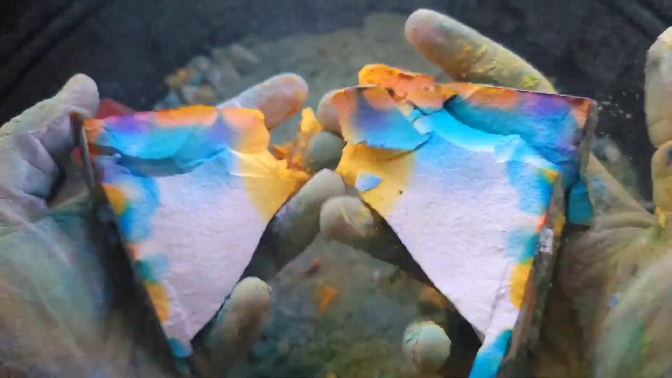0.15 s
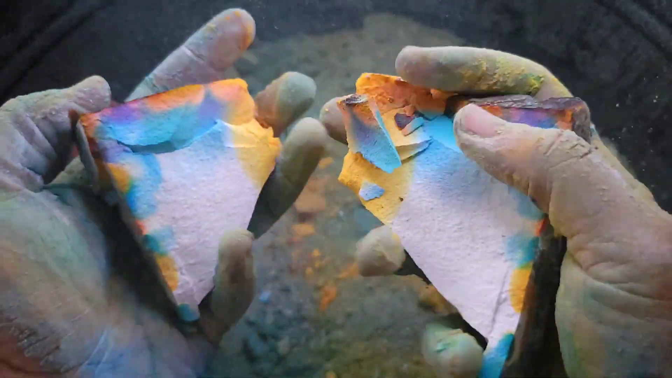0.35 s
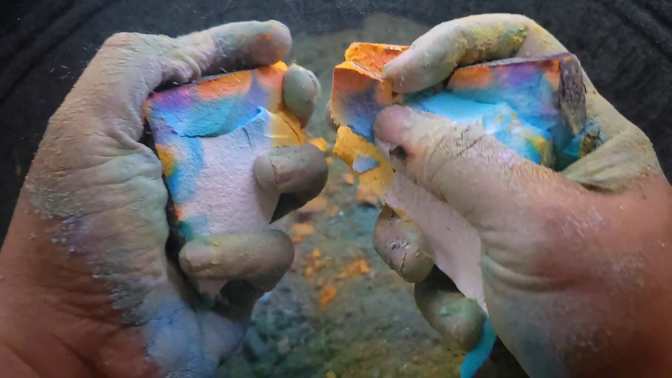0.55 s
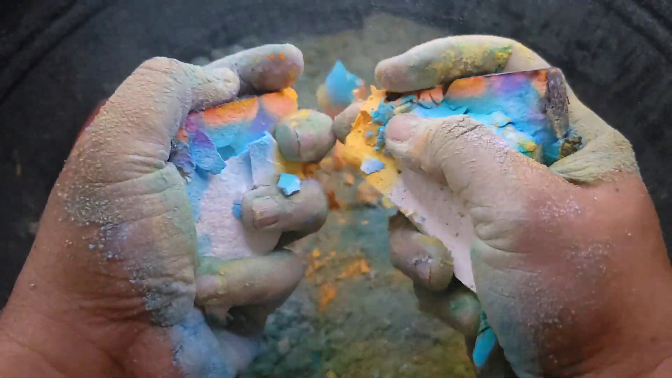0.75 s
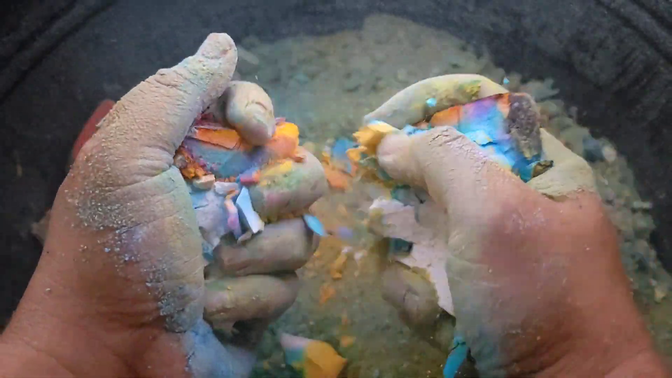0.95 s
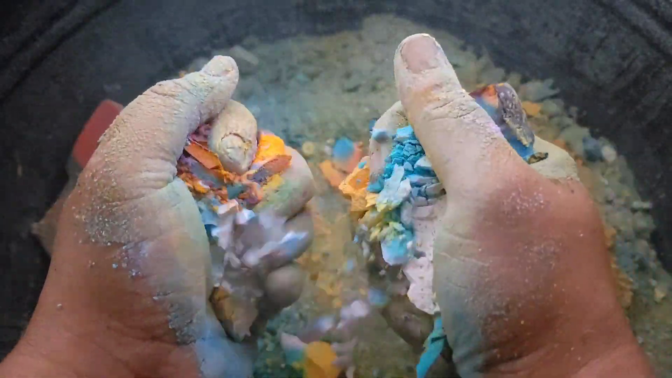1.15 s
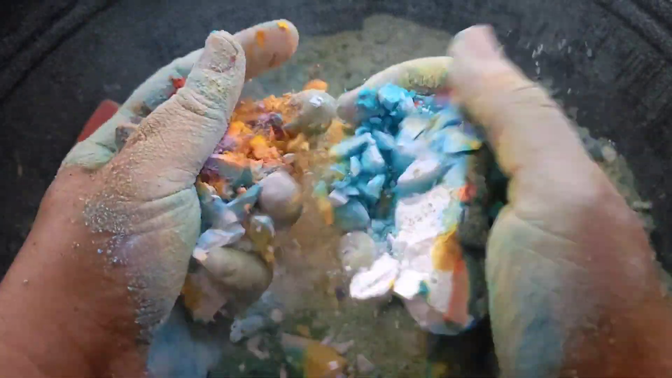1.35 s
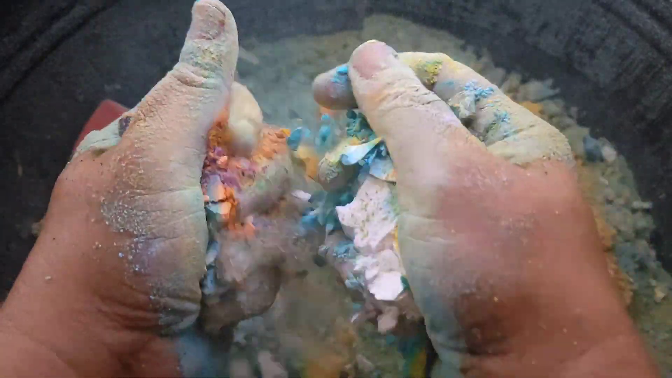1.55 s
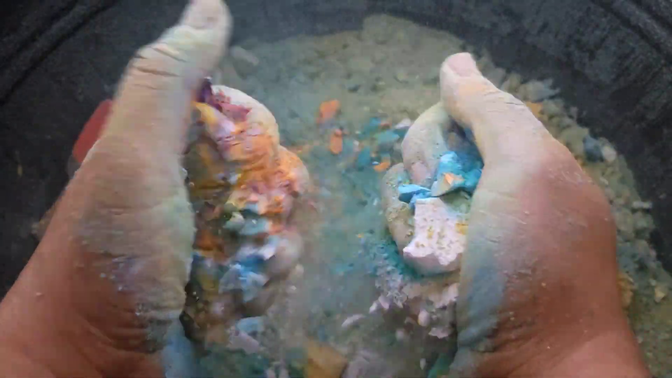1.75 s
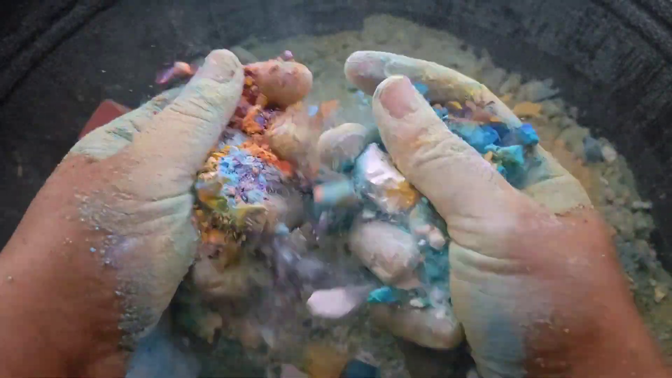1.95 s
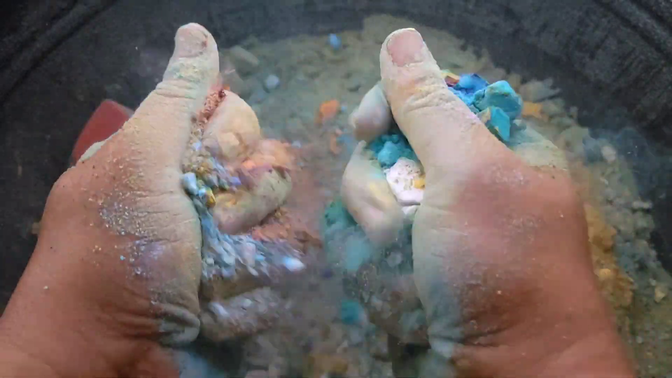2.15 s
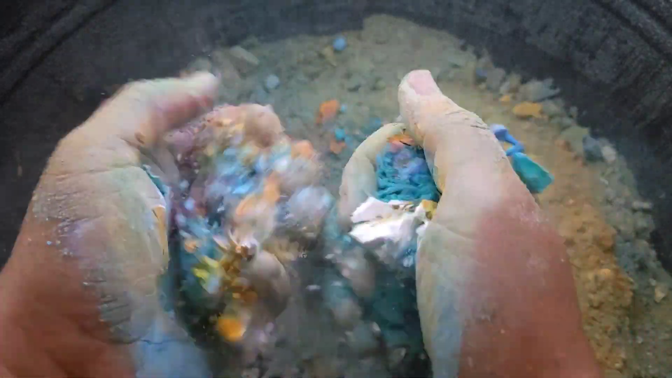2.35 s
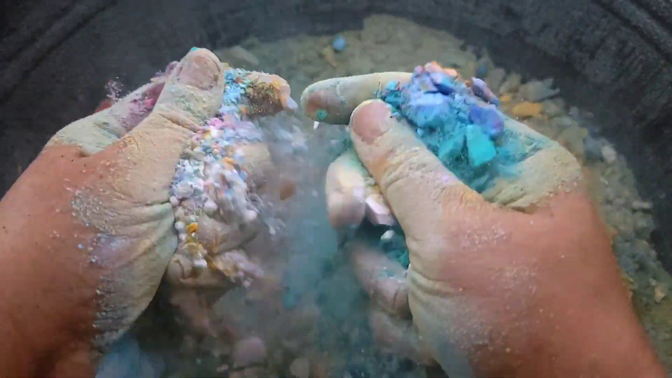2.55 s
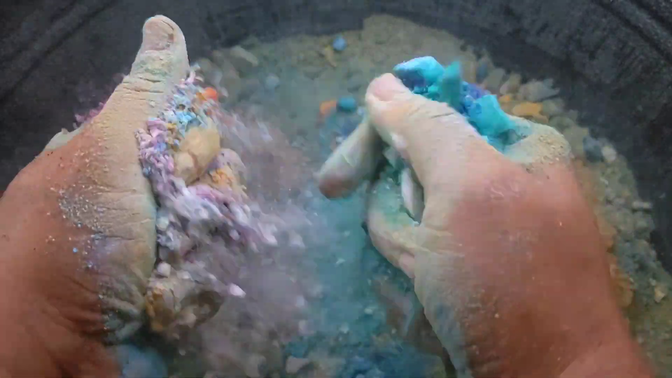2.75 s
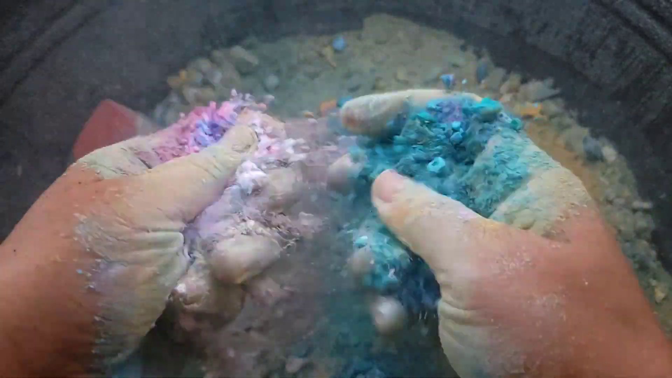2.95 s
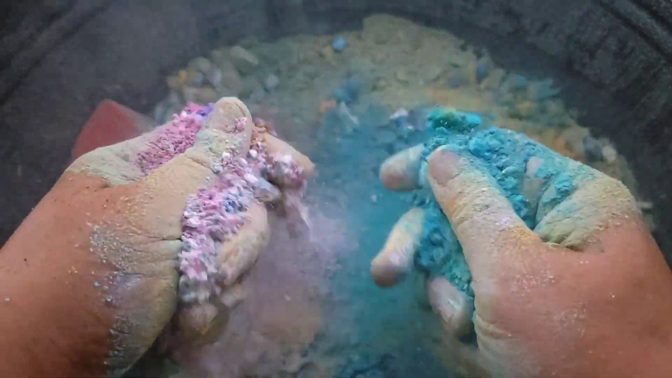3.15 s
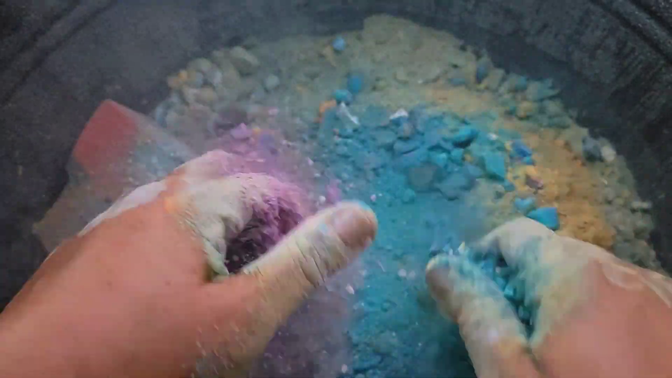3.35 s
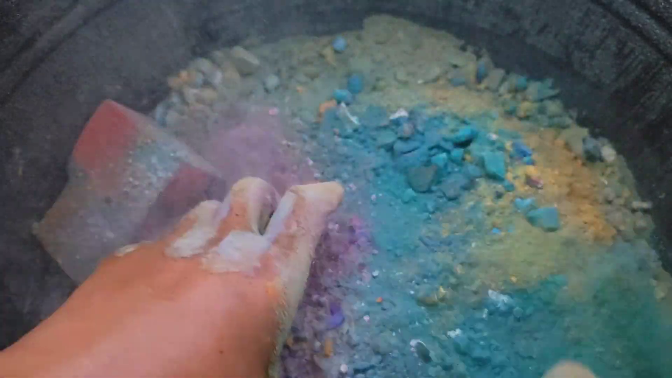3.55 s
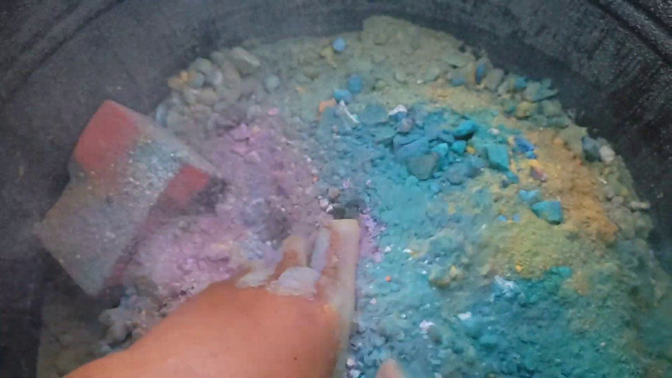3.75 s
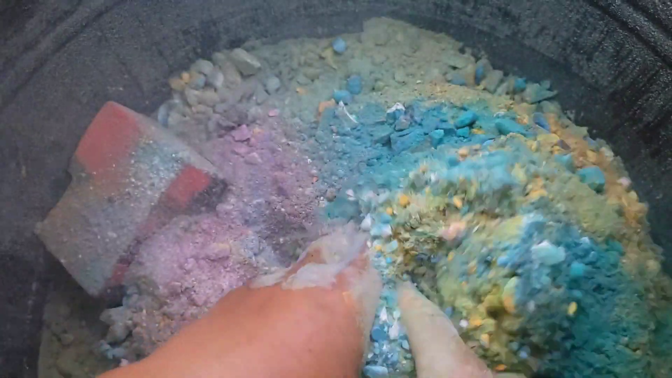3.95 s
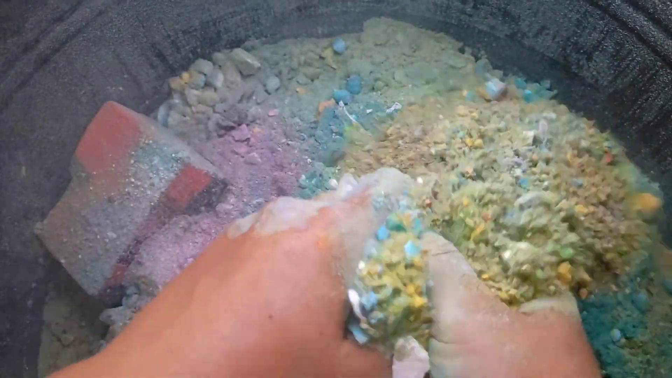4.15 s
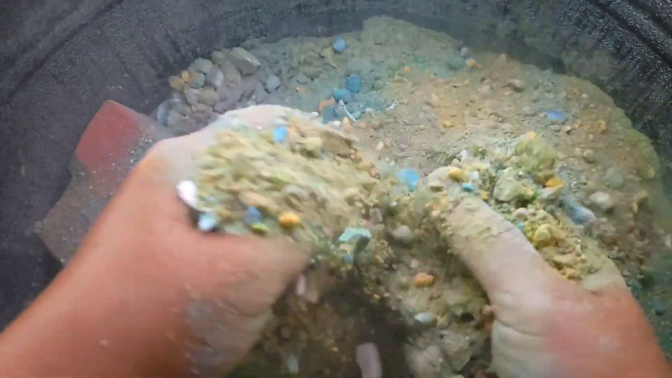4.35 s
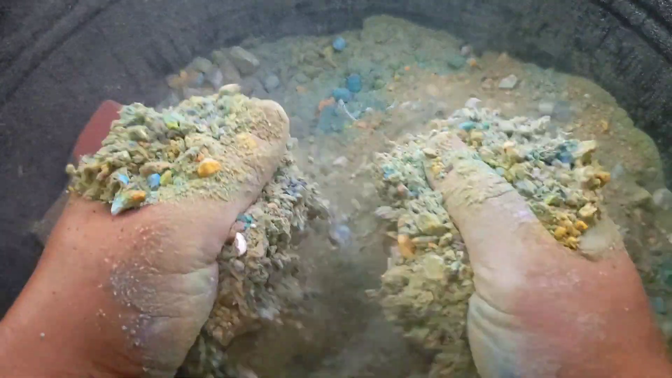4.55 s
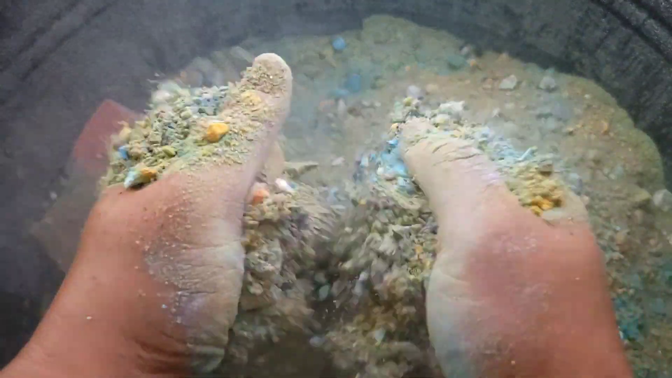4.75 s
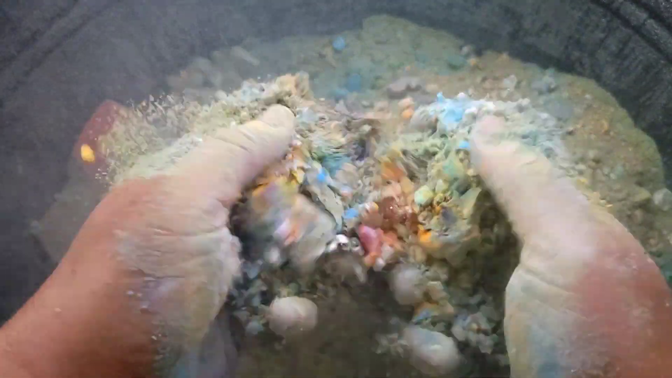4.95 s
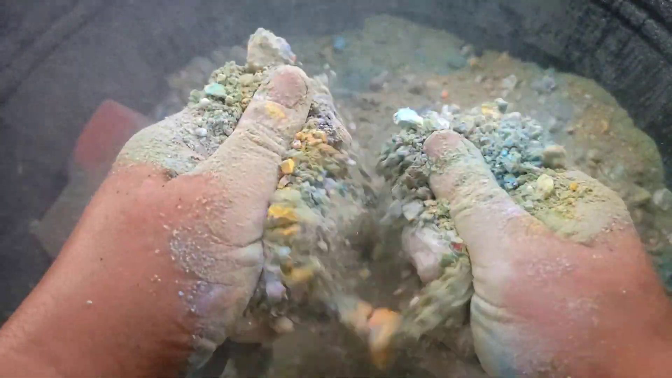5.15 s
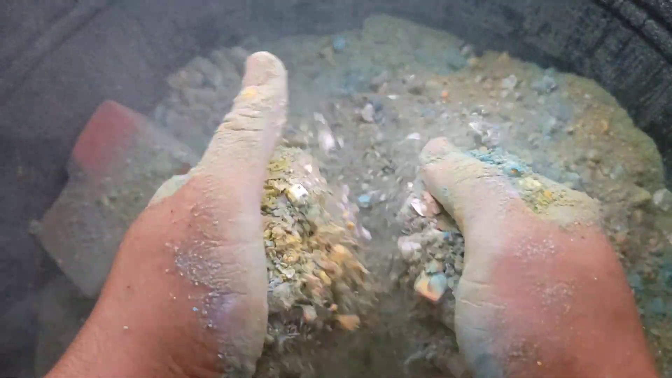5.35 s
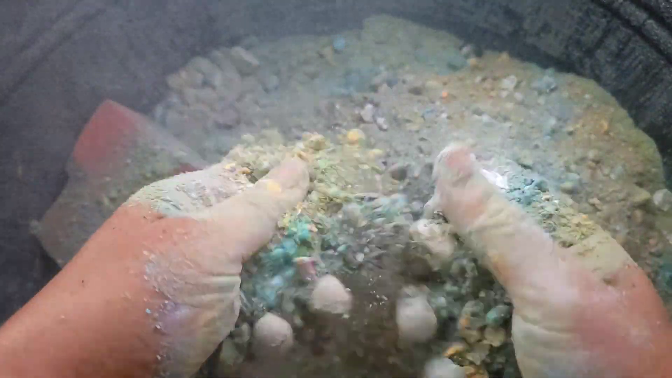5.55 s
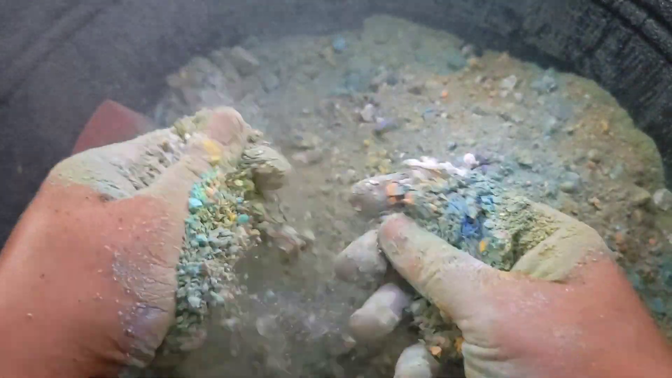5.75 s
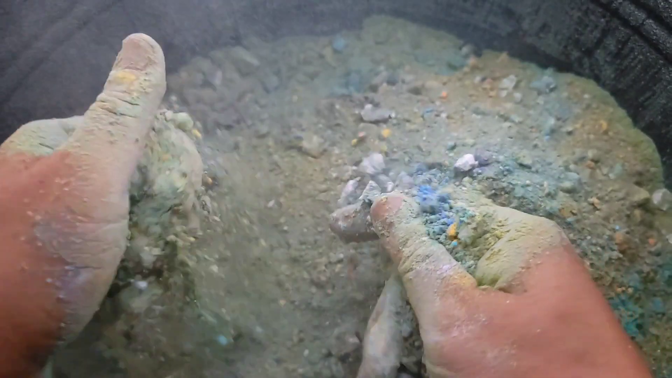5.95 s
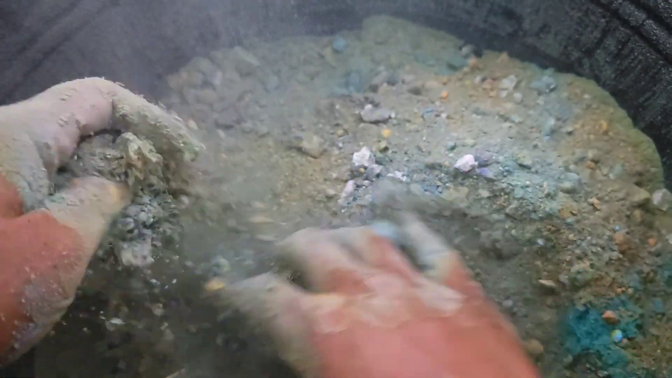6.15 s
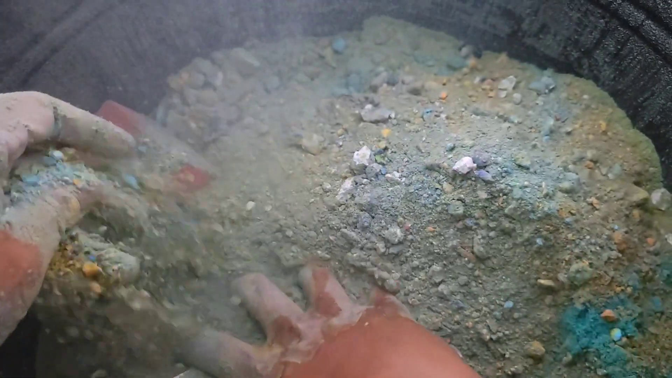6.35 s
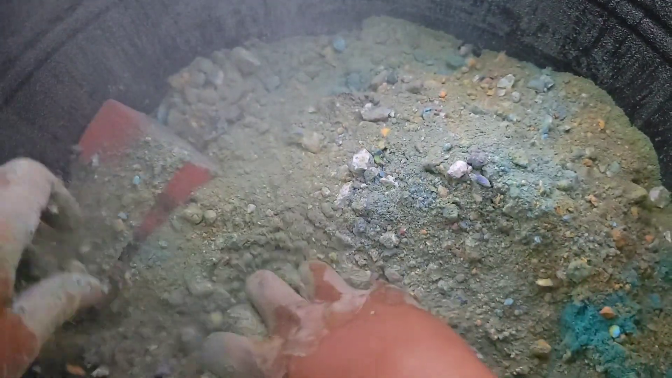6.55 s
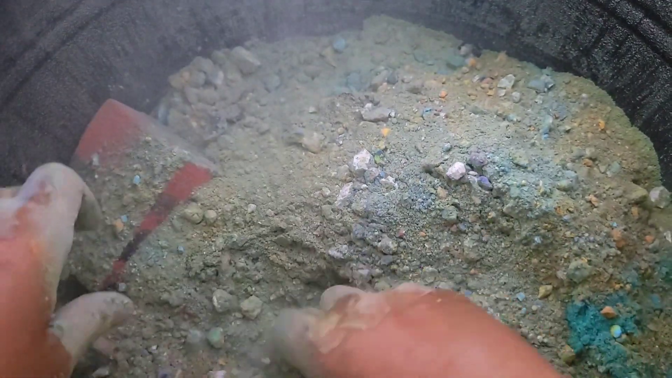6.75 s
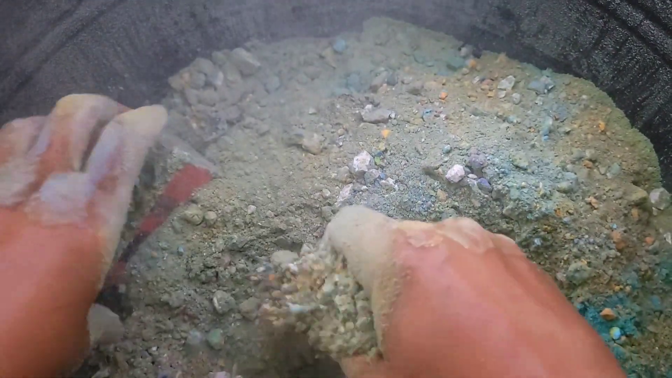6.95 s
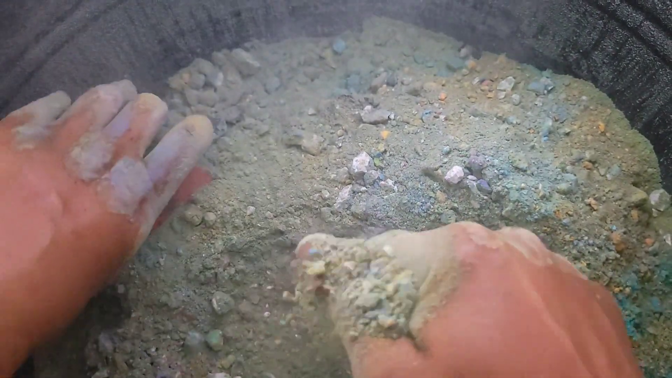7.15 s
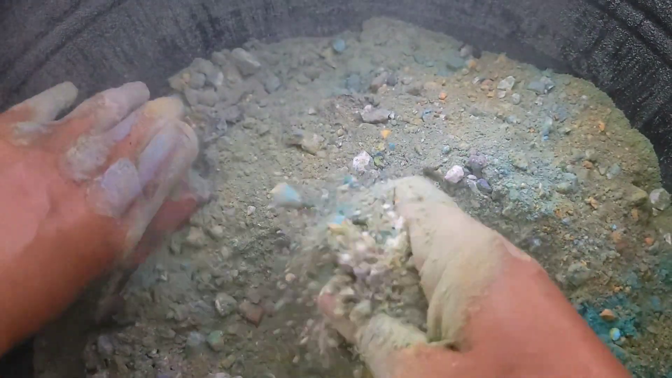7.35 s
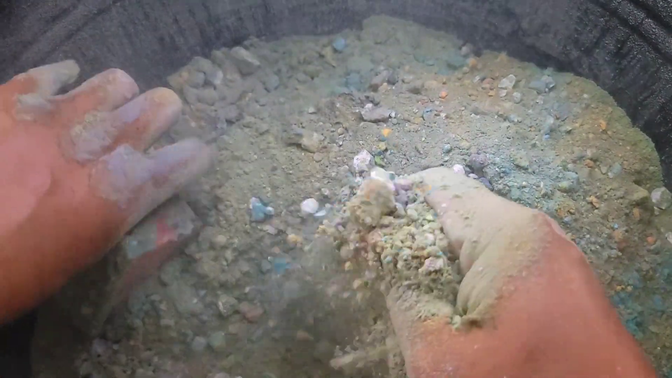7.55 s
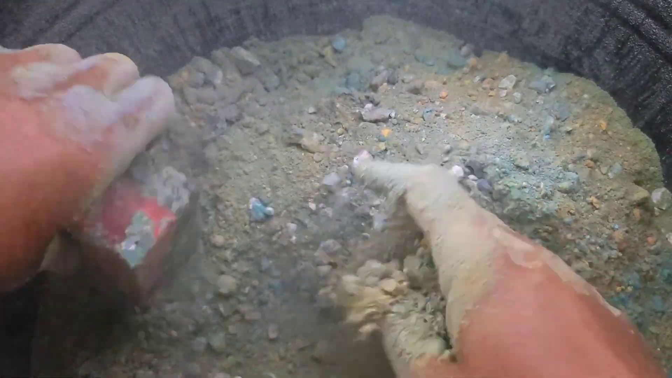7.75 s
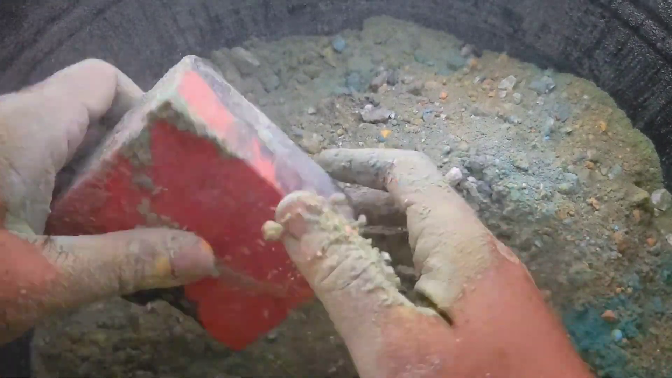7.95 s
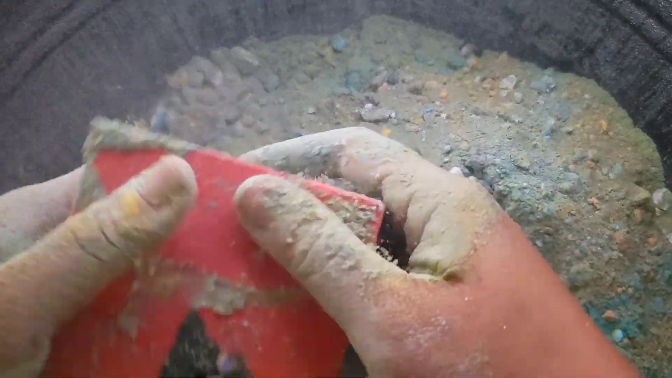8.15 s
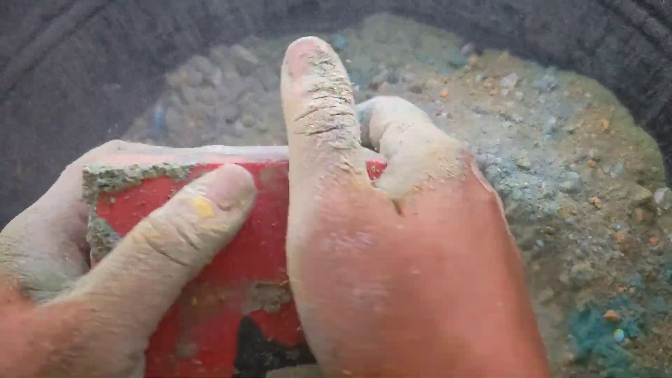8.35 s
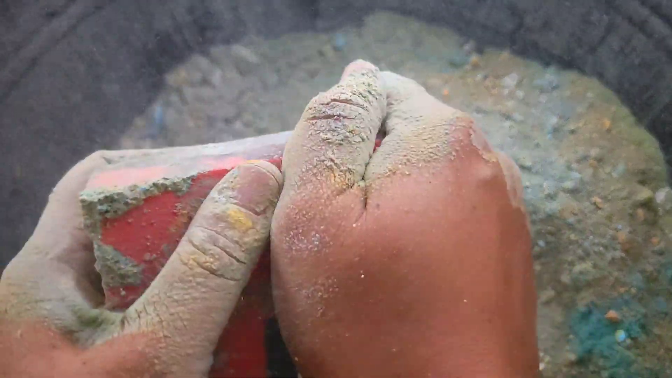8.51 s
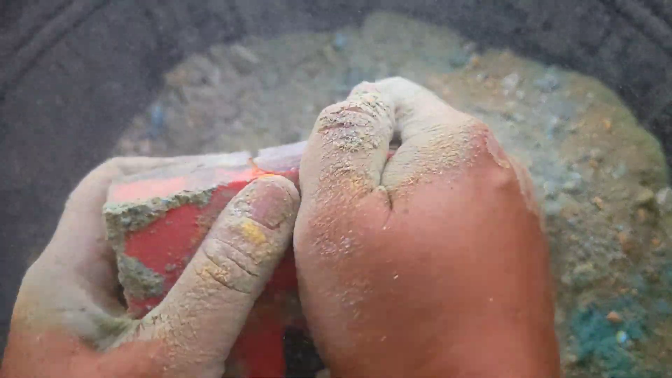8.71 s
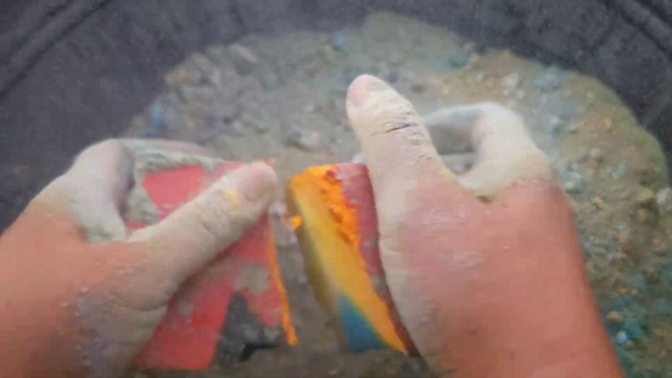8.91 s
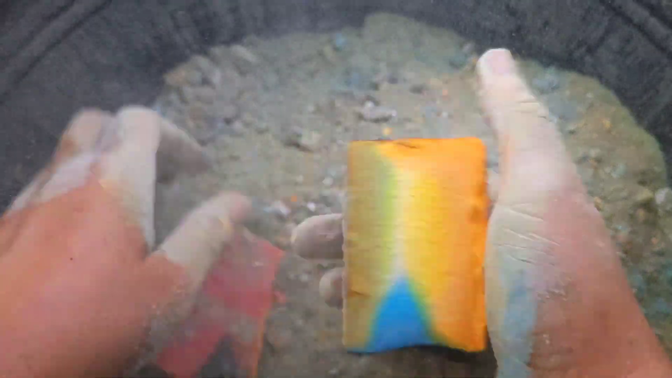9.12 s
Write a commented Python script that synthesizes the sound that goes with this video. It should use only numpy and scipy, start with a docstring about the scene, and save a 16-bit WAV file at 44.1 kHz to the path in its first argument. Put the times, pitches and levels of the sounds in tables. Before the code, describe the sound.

Close to the microphone, two hands crush chalk over a plastic tub, with irregular gritty crunches, sharp snaps and trickling crumbs. Fingers dig into the powder with a muffled crunch, crumble more lumps and dig again. Then a fresh block is picked up with a few dull bumps, rubbed between dry palms and snapped in two. The tub resonates slightly and the small room hums faintly.

```python
"""Crumbling grit and sharp snaps: two hands crush gym chalk over a plastic tub, close to the microphone.
Squeezed chalk breaks grain by grain, larger fractures ring their fragments, and fingers dig in the
powder with a muffled crunch. Then a fresh block is picked up with a few bumps, rubbed between dry
palms that catch and slip, and broken in two. The tub resonates; the small room hums faintly."""
import sys
import numpy as np
from scipy import signal
from scipy.fft import rfft, irfft, next_fast_len
from scipy.io import wavfile
from scipy.ndimage import uniform_filter1d, map_coordinates

SR = 44100
rng = np.random.default_rng(int(sys.argv[2]) if len(sys.argv) > 2 else 0)


def materialize(psi):
    """Save the field psi as 16-bit PCM at rate SR to the path in sys.argv[1].

    A 1-D psi becomes a single channel; in a 2-D psi each row is a channel.
    """
    bounded = np.clip(np.atleast_2d(psi).T, -1, 1)
    quanta = np.round(bounded * 32767).astype(np.int16)
    wavfile.write(sys.argv[1], SR, quanta)


N = 409248

# fist closing on chalk; crumbs trickling from the hands:
# (start [s], length [s], grit [dB], crumbs [dB], powder [dB])
SQUEEZES = [(0, 0.0071, -38, -71, -53), (0.112, 0.17, -42, -54, -45.5), (0.49, 0.029, -49, -62, -58),
            (0.62, 0.23, -45, -55, -49), (0.781, 0.048, -26, -27, -29.5), (0.836, 0.084, -34.5, -54, -41),
            (0.957, 0.11, -35, -33.5, -36.5), (1.084, 0.054, -35, -38, -42), (1.208, 0.13, -41, -43, -44),
            (1.34, 0.12, -35, -37, -48), (1.464, 0.13, -38, -41, -50), (1.553, 0.15, -36, -38, -41),
            (1.685, 0.047, -45, -60, -52), (1.901, 0.12, -42, -47, -42), (2.032, 0.097, -35.5, -42, -36),
            (2.145, 0.079, -37, -42, -42), (2.308, 0.14, -47.5, -44.5, -52),
            (2.478, 0.086, -39.5, -39.5, -41.5), (2.584, 0.091, -41, -46, -42.5),
            (2.692, 0.31, -43.5, -41, -48), (3.012, 0.28, -45, -44.5, -48.5),
            (3.369, 0.096, -48.5, -42, -44.5), (4.396, 0.22, -43.5, -42, -50), (4.544, 0.15, -44, -43, -44),
            (4.692, 0.1, -36, -39, -41.5), (4.82, 0.064, -35.5, -44, -37.5), (4.899, 0.042, -38, -42, -42),
            (4.984, .145, -40.5, -38.5, -45), (5.149, 0.097, -39.5, -40, -41.5),
            (5.235, 0.13, -40.5, -54, -38.5), (5.49, 0.18, -47.5, -48, -52), (5.719, 0.22, -44.5, -44, -45),
            (6.11, 0.088, -40, -47, -43), (6.239, 0.053, -37, -36, -31.5), (6.315, 0.049, -40, -47, -36),
            (6.869, 0.25, -45, -45, -49.5), (7.176, 0.025, -42, -37, -37.5), (7.24, 0.098, -43, -40, -41),
            (7.408, 0.11, -40, -35.5, -41), (7.702, 0.12, -49, -41, -47), (8.567, 0.059, -39.5, -54, -35)]
TRICKLES = [(0.398, 3.15, -50, -56, -56), (3.81, 2.85, -50, -49, -60), (7.302, 0.68, -47.5, -47.5, -56)]
# pushes into powder: (deepest [s], 60 dB rise [s], 60 dB fall [s], powder [dB], crumbs [dB], grit [dB])
DIGS = [(3.54, 0.032, 0.26, -34, -29, -53), (3.668, 0.23, 0.11, -29.5, -31, -43.5),
        (3.768, 0.57, 0.54, -21, -26.5, -48.5), (3.92, 0.85, 1, -32, -53, -67),
        (4.19, 1.5, 0.77, -49, -36.5, -64), (4.27, 0.55, 0.11, -41, -27, -43.5),
        (6.35, 0.26, 0.38, -25.5, -42, -40), (6.44, 0.21, 0.11, -28, -32, -38.5),
        (6.494, 0.39, 0.32, -23.5, -53, -42), (6.608, 0.15, 0.51, -28, -27, -39),
        (6.729, 0.17, 1, -40, -33.5, -50), (7.405, 0.19, 0.11, -44, -35, -47),
        (7.605, 0.03, 0.12, -21.5, -59, -33.5), (9.123, 0.056, 0.16, -29.5, -35, -44)]
# spectral shapes: (frequency [Hz], relative level [dB])
CRUMB_SPECTRUM = [(150, -58), (400, 20.5), (700, 3.5), (1100, 8), (1800, 0), (2700, -3), (4500, -19),
                  (12000, -104)]
GRIT_SPECTRUM = [(700, -58), (1700, -3.5), (2700, -0.5), (4200, 0.5), (6500, -2), (9000, -6.5),
                 (12500, -23), (16000, -48)]
POWDER_SPECTRUM = [(20, -26), (50, 4), (120, 1), (300, 0), (500, 1), (750, -8), (1300, -12), (2200, -25.5),
                   (6000, -43), (15000, -47)]
SIZZLE_SPECTRUM = [(4000, -63), (7000, -10), (9000, 9), (11000, 5), (13000, 1), (16000, -6)]
AIR_SPECTRUM = [(20, -23), (50, 2), (110, 4), (160, 1), (250, 0.5), (380, 1.5), (600, -12.5), (1000, -12),
                (2000, -21), (5000, -20.5), (9000, -26.5), (12000, -33.5), (16000, -35)]
CRACK_SPECTRUM = [(500, -34), (1500, -6), (3500, 4), (6000, 5.5), (9000, -3.5), (12500, -24.5),
                  (16000, -13.5)]
RASP_SPECTRUM = [(400, -24), (1200, -30), (2200, 2), (3600, 5), (6800, 10.5), (9000, 0.5), (13000, -38)]
# room hum: (frequency [Hz], level [dB], waver [dB])
HUM_TONES = [(233.8, -48, 3.5), (1500, -65, 8)]
# hum contour: (time [s], gain [dB])
HUM_GAIN = [(0, 3), (.25, -9), (1.3, -1), (8.2, 1.5), (8.75, 0), (9.0, 1)]
# loudest fractures: (time [s], ring [dB], ring pitch [Hz], crack [dB], knock [dB])
SNAPS = [(.0778, -43, 2190, -43.5, -48), (.1317, -17.5, 1600, -27, -21.5), (.209, -38, 2300, -48, -47),
         (.222, -34, 1440, -55, -37), (.256, -29, 1650, -40, -30), (.4217, -31.5, 3020, -42, -42.5),
         (.5055, -46, 4450, -34, -65), (.5129, -30, 5930, -40, -53), (.5234, -31, 1650, -18, -30),
         (.5867, -30, 2670, -29.5, -62), (.6133, -32, 2180, -28, -49), (.6237, -20.5, 2600, -28, -36),
         (.6268, -19, 3450, -18.5, -22.5), (.633, -28, 2630, -39, -39), (.6704, -41, 2510, -32.5, -37.5),
         (.7478, -35, 2000, -29.5, -39), (.7719, -34.5, 3020, -25.5, -35), (.7966, -23, 2900, -23, -22.5),
         (.8035, -14, 3200, -37, -40), (.822, -27, 4190, -16.5, -48), (.8371, -17.5, 3570, -39, -46),
         (.885, -48, 2000, -27, -48), (.8896, -20.5, 5460, -42, -54), (.9132, -20.5, 2350, -25, -55),
         (.9409, -32, 4400, -39, -49), (.9657, -7.5, 1490, -30, -17.5), (.9682, -14, 1220, -25, -40),
         (.9849, -15, 4200, -36, -22), (1.024, -18.5, 1535, -26, -17.5), (1.0286, -20, 2500, -30, -37),
         (1.0417, -14.5, 2180, -38, -32), (1.063, -25, 2760, -23.5, -32), (1.0899, -20.5, 3500, -44, -34),
         (1.1939, -31, 1930, -31.5, -40), (1.2454, -31.5, 2000, -41, -39), (1.2812, -35, 2500, -39, -39),
         (1.3339, -47, 1570, -30.5, -55), (1.352, -24.5, 2120, -29, -39), (1.3596, -27, 2540, -35, -33),
         (1.4294, -31, 1220, -47, -30), (1.4399, -29, 2050, -46, -37), (1.4438, -27.5, 1800, -42, -30),
         (1.4524, -28.5, 1900, -42, -37), (1.5054, -39, 3000, -38, -36), (1.5696, -29, 1870, -32, -35),
         (1.583, -34, 4480, -32, -39), (1.5961, -28, 2600, -42, -48), (1.6296, -37, 5600, -33, -37),
         (1.6394, -22.5, 1860, -23, -24), (1.6531, -28, 2800, -35, -44), (1.6685, -27, 2340, -21, -27),
         (1.7018, -38, 3000, -34, -52), (1.715, -34, 2800, -41, -53), (1.7987, -28.5, 1920, -44, -32.5),
         (1.9298, -33, 2980, -49, -43), (1.9605, -28.5, 2390, -36, -42), (1.9691, -24, 2000, -33, -28.5),
         (1.9992, -35, 3400, -47, -35), (2.0105, -27, 1950, -51, -31), (2.0349, -25.5, 1840, -48, -36),
         (2.0475, -32, 1920, -29.5, -46), (2.0669, -26, 2070, -48, -25.5), (2.095, -28.5, 6070, -23.5, -49),
         (2.1061, -25.5, 2140, -46, -31), (2.1605, -35.5, 1600, -45, -35), (2.1906, -36, 2100, -37, -37),
         (2.2205, -30.5, 2630, -55, -36), (2.2845, -24, 2480, -39, -32.5), (2.621, -40, 1700, -40, -31.5),
         (2.6556, -40, 3900, -31.5, -50), (2.7076, -32, 2980, -54, -53), (2.7714, -25.5, 3320, -59, -29),
         (2.8464, -31, 2040, -55, -38), (2.86, -36, 2110, -43, -42), (2.8923, -44, 1500, -47, -31.5),
         (2.9175, -39, 1500, -36, -37), (2.9466, -36, 1480, -39, -29.5), (3.0646, -34, 890, -44, -33.5),
         (3.0923, -33, 3500, -49, -52), (3.181, -31, 2970, -26, -37), (3.2711, -32.5, 1950, -54, -40),
         (3.2813, -29.5, 875, -42, -30.5), (3.3932, -31, 2870, -55, -29.5), (3.4391, -33, 5300, -41, -43),
         (3.45, -26, 2900, -28, -41), (4.187, -42, 1340, -58, -38), (4.3981, -36.5, 3630, -43, -43),
         (4.5199, -15.5, 1500, -50, -32), (4.5604, -40, 2290, -24.5, -34), (4.6309, -17, 1640, -55, -28),
         (4.6502, -36, 2420, -27.5, -50), (4.6753, -26.5, 3850, -48, -51), (4.704, -28, 1370, -18.5, -31),
         (4.7105, -31, 3200, -36, -47), (4.733, -24.5, 1470, -49, -39), (4.7486, -25, 2800, -29, -44),
         (4.768, -35, 3000, -43, -50), (4.804, -31, 1510, -36, -56), (4.8331, -22, 2300, -23.5, -36),
         (4.8469, -27, 1600, -43, -48), (4.8718, -30, 2280, -42, -33), (4.886, -25.5, 4600, -41, -27),
         (4.9288, -41, 2400, -32.5, -46), (5.0099, -30, 3600, -33, -38), (5.0329, -37, 2800, -37, -40),
         (5.0721, -33, 4540, -39, -48), (5.1045, -33, 2010, -25.5, -38), (5.1343, -29.5, 1810, -55, -36),
         (5.1434, -26, 1240, -26.5, -45), (5.1718, -30, 3100, -45, -39), (5.2082, -21.5, 2180, -23, -26.5),
         (5.2599, -35, 3700, -36, -32.5), (5.3017, -32, 2530, -30, -33), (5.4423, -35, 2350, -44, -51),
         (5.5629, -38, 3160, -56, -49), (5.6408, -36.5, 1500, -59, -41), (5.7418, -40, 3300, -46, -35.5),
         (5.8001, -32, 2380, -48, -53), (5.8064, -30, 2700, -50, -35), (5.813, -32, 1580, -40, -30.5),
         (5.9878, -33.5, 2840, -38, -60), (6.0985, -36.5, 2840, -44, -45),
         (6.1203, -28.5, 2080, -41, -30.5), (6.26, -43, 2920, -34, -33), (6.4387, -29.5, 1500, -43, -46),
         (6.5291, -34, 1900, -28, -46), (6.592, -27.5, 4730, -51, -32), (6.596, -19, 1060, -50, -43),
         (6.631, -32, 1390, -34, -28.5), (6.6502, -36, 1340, -45, -40), (6.721, -22.5, 1500, -50, -30),
         (6.7761, -25, 1500, -55, -26.5), (6.849, -27.5, 1600, -57, -38), (6.993, -30, 3500, -40, -39),
         (7.0052, -31, 2900, -31, -37), (7.0711, -29.5, 1720, -35.5, -43), (7.2434, -43, 3960, -27, -40),
         (7.3185, -31, 1410, -29, -29.5), (7.4062, -45, 2100, -44, -36), (7.4153, -31.5, 1980, -33, -39),
         (7.4704, -37, 2560, -35, -46), (7.6053, -31, 7190, -36, -21), (7.7528, -33.5, 2240, -32, -34),
         (8.023, -37, 4000, -45, -44), (8.0916, -34, 3620, -55, -43), (8.1732, -34, 4900, -46, -54),
         (8.5022, -40, 4400, -46, -60), (8.5345, -49, 5100, -43, -60), (8.5585, -15.5, 1670, -10.5, -17),
         (9.1162, -29, 2742, -27, -30)]
# finest splinters flying off: (time [s], level [dB])
SPLINTERS = [(0.129, -31), (0.5057, -24), (0.613, -31), (0.626, -21), (0.8714, -19), (0.9657, -22),
             (0.9807, -18), (1.061, -21), (1.3329, -23), (1.6681, -21), (2.0946, -20), (3.1792, -34),
             (3.448, -32), (4.7037, -28), (5.2071, -32), (6.5956, -22)]
# dry skin on chalk: (start [s], length [s], release t60 [s], rasp [dB], sizzle [dB], swell [dB],
# hollow re rasp [dB], hollow start pitch [Hz], hollow end pitch [Hz], roughness [0-1])
RUBS = [(0.301, 0.035, 0.11, -42.5, -72, -1, -4, 5300, 5420, 0.15),
        (0.373, 0.047, 0.1, -43.5, -55, 18, -3.5, 5100, 4770, 0.5),
        (0.45, 0.033, 0.034, -40.5, -50, -8, -3, 4830, 4770, 0.5),
        (3.854, 0.057, 0.09, -56, -69, 0, 5, 7740, 7800, 0.4),
        (7.228, 0.077, 0.04, -33.5, -33.5, 9.5, 1, 4130, 3800, 0.3),
        (7.245, .068, 0.044, -42.5, -50, 0, 4, 2420, 2180, 0.1),
        (7.482, 0.16, 0.088, -42, -46.5, -15, -23, 3850, 3700, 0.7),
        (7.64, 0.11, 0.1, -51, -57, 21, 3, 3160, 3010, 0.62),
        (7.984, 0.052, 0.25, -41.5, -60, -2, 5, 3880, 3800, 0.24),
        (8.079, 0.13, 0.051, -41, -50, 3, 6, 3523, 3500, 0.04),
        (8.224, 0.085, 0.088, -42, -54, -4, 1.5, 3483, 3450, 0.29),
        (8.309, 0.033, 0.35, -36.5, -51, 7, -1, 3490, 3380, 0.37),
        (8.366, 0.015, .05, -40, -54, -8, 5, 4520, 4460, 0.3),
        (8.697, 0.044, 0.068, -49, -69, -1, 1.5, 2750, 2690, 0.82),
        (8.779, 0.08, 0.068, -38, -52, 15, -5, 4520, 4120, 0.73),
        (8.866, 0.044, 0.018, -35.5, -47, 10, 1.5, 3263, 3190, 1),
        (8.926, 0.0098, 0.014, -37.5, -58, -3, 3, 5100, 5000, 0.46),
        (9.089, 0.035, 0.051, -35, -42, 19, -6, 3030, 3050, 0.57),
        (9.144, 0.033, 0.13, -34, -42, 2.5, -3, 4780, 4650, 0.3),
        (9.235, 0.035, .05, -57.5, -70, -3, 3, 4700, 4600, .1)]
# hollow between hand and block, at rest: (frequency [Hz], width [Hz], gain [dB])
HOLLOW_MODES = [(2240, 100, 6.5), (2630, 140, 3.5), (3500, 76, 19), (4520, 160, 5.5), (5100, 180, 6)]
# flat chips ringing as they break off: (time [s], level [dB], pitch [Hz])
CLINKS = [(0.8376, -1.5, 3630), (0.966, -12, 4700), (2.0472, -9.5, 1970), (2.2847, -12, 2150),
          (4.5194, -5.5, 2670), (7.4164, -16, 3500), (7.4706, -15, 2800)]
# dull blows between hands, lumps, block and tub: (time [s], level [dB], pitch [Hz], t60 [s])
BUMPS = [(0.971, -13, 340, 0.042), (3.534, -14.5, 1150, 0.016), (3.5409, -8, 1150, 0.022),
         (4.2373, -8, 1110, 0.0053), (4.276, -15, 1030, 0.013), (4.832, -30, 135, 0.27),
         (6.287, -15, 66, 0.17), (6.325, -24, 127, 0.29), (6.485, -14.5, 420, 0.036),
         (7.182, -18.5, 69.4, 0.22), (7.233, -9, 88, 0.063), (7.322, -8, 78.6, 0.046),
         (7.445, -11, 69, 0.052), (7.608, 1.5, 83, 0.067), (8.558, 5, 376, 0.0097),
         (9.115, -17, 870, 0.017), (9.126, -13, 86, 0.073), (9.165, -19, 61.7, 0.13)]
# a whole block gives way and the tub booms: (time [s], level [dB])
BOOMS = [(0.976, -26), (8.566, -27)]
# modes of the boom: (frequency [Hz], gain [dB], t60 [s])
BOOM_MODES = [(62.6, -1.5, 0.07), (263, 4.5, 0.062), (330, 3, 0.079), (410, -3, 0.11)]
# tub cavity: (frequency [Hz], width [Hz], gain [dB])
TUB_MODES = [(181.6, 6.1, 14), (246.6, 30, 8.5), (269, 59, 8.5), (370, 8, 3)]
# room decay: (frequency [Hz], t60 [s])
ROOM_DECAY = [(150, 0.33), (400, 0.13), (1000, 0.11), (2000, 0.077), (5000, 0.1), (12000, 0.23)]

SQUEEZE_ATTACK_S, SQUEEZE_T60_S, SQUEEZE_SWELL_DB = 0.0054, 0.13, -1.5
SNAP_RMS_SPAN_S, CLINK_T60_S = 0.005, 0.012
SPLINTER_HZ, SPLINTER_WIDTH_HZ = 12600, 11000
RUB_ATTACK_S, RUB_RUMBLE_DB, RUB_CATCH_DB = 0.0092, -13.5, 1
CHATTER_RATE_HZ, CHATTER_PITCH_SHARE = 700, 0.1
BAND_LIMIT_HZ = 16000


def amp(db):
    """Decibels to gain."""
    return 10 ** (np.asarray(db) / 20)


def unit(x):
    """x at rms 1."""
    return x / np.sqrt(np.mean(x ** 2) + 1e-20)


def steady(x, span_s):
    """x with its running rms held near 1."""
    size = max(int(span_s * SR), 8)
    return x / np.sqrt(np.abs(uniform_filter1d(uniform_filter1d(x ** 2, size), size)) + 1e-9)


def add(out, start_s, x):
    """Mix x into out."""
    span = out[..., max(round(start_s * SR), 0):][..., :x.shape[-1]]
    span += x[..., :span.shape[-1]]


def along(points, hz):
    """Interpolate (frequency [Hz], value) points on a log axis."""
    knots_hz, values = np.transpose(points)
    return np.interp(np.log(hz + 1), np.log(knots_hz + 1), values)


def wobble(rate_hz):
    """Smooth random curve."""
    return map_coordinates(rng.standard_normal(8192), [np.arange(N) * rate_hz / SR], mode="wrap")


def filtered(x, response):
    """Apply a complex frequency response."""
    size = 2 * next_fast_len((len(x) + min(len(x) // 4, SR // 2)) // 2, real=True)
    return irfft(rfft(x, size) * response(np.fft.rfftfreq(size, 1 / SR)), size)[:len(x)]


def coloured(x, spectrum):
    """Minimum-phase filter with the given spectrum."""
    def response(hz):
        cepstrum = irfft(np.log(amp(along(spectrum, hz))))
        cepstrum[1:len(hz) - 1] *= 2
        cepstrum[len(hz):] = 0
        return np.exp(rfft(cepstrum))
    return filtered(x, response)


def resonance(hz, centre_hz, width_hz):
    """Response of one damped mode."""
    return 1j * hz * width_hz / (centre_hz ** 2 - hz ** 2 + 1j * hz * width_hz)


def resonated(x, modes):
    """x through parallel damped modes."""
    return filtered(x, lambda hz: sum(amp(db) * resonance(hz, *mode) for *mode, db in modes))


def grains(rate_hz, spread_db, clump_db):
    """Tiny breaks of random time and size, swelling in avalanches."""
    hit = rng.random(N) < rate_hz / SR
    size_db = spread_db * np.clip(rng.standard_normal(N), -3, 2.05) + clump_db * wobble(130)
    return hit * amp(size_db) * rng.choice([-1, 1], N)


def stroke(length_s, attack_s, t60_s, swell_db):
    """Gain of one hand movement: attack, swelling or sagging hold, release."""
    t = np.arange(int((length_s + t60_s) * SR)) / SR
    hold_db = swell_db * (np.minimum(t / length_s, 1) - 0.5)
    release_db = -60 * np.maximum(t - length_s, 0) / t60_s
    return np.minimum(t / attack_s, 1) * amp(hold_db + release_db)


def crushing_gains():
    """Grit, crumb and powder gains; squeezes, trickles and digs add in power."""
    power = np.zeros((3, N))
    for start_s, length_s, *levels_db in SQUEEZES + TRICKLES:
        grip = stroke(length_s, SQUEEZE_ATTACK_S, SQUEEZE_T60_S, SQUEEZE_SWELL_DB)
        add(power, start_s, np.outer(amp(levels_db), grip) ** 2)
    for deepest_s, rise_s, fall_s, powder_db, crumbs_db, grit_db in DIGS:
        t = np.arange(-rise_s, fall_s, 1 / SR)
        push = amp(-60 * np.maximum(-t / rise_s, t / fall_s))
        add(power, deepest_s - rise_s, np.outer(amp([grit_db, crumbs_db, powder_db]), push) ** 2)
    return np.sqrt(power + 1e-12)


def crumb_rings(breaks, q, sizes=14):
    """Each break rings one crumb; size sets pitch."""
    crumb = rng.integers(sizes, size=N)
    return sum(unit(signal.lfilter(*signal.iirpeak(hz, q, SR), breaks * (crumb == k)))
               for k, hz in enumerate(np.geomspace(700, 8000, sizes)))


def crumbling(grit_gain, crumb_gain, powder_gain):
    """Squeezed chalk gives way grain by grain; packed powder crunches dully."""
    breaks = grains(rate_hz=3000, spread_db=5.6, clump_db=2.6)
    crackle = unit(unit(breaks) + amp(6) * unit(crumb_rings(breaks, q=5.5)))
    fine_breaks = unit(grains(rate_hz=2500, spread_db=4.5, clump_db=2))
    # deep in powder, crackle blurs into rustle
    buried = powder_gain / (powder_gain + 4 * grit_gain)
    dust = amp(-7.5) * buried * rng.standard_normal(N)
    coarse = (1 - buried) * crackle + dust
    fine = (1 - buried) * (crackle + amp(-8) * fine_breaks) + dust
    crumbs = steady(coloured(coarse, CRUMB_SPECTRUM), span_s=0.064)
    grit = steady(coloured(fine, GRIT_SPECTRUM), span_s=0.22)
    slips = grains(rate_hz=1400, spread_db=0.5, clump_db=3.5)
    powder = steady(coloured(slips, POWDER_SPECTRUM), span_s=0.045)
    # hard squeezing sheds the brightest splinters
    effort = np.minimum(grit_gain / amp(-34), 1) ** 0.67
    ticks = grains(rate_hz=680, spread_db=8, clump_db=3.5)
    sparkle = effort * steady(coloured(ticks, SIZZLE_SPECTRUM), span_s=0.067)
    return (crumb_gain * amp(-4.5) * crumbs
            + grit_gain * (amp(-0.47) * grit + amp(-12.5) * sparkle)
            + powder_gain * amp(-2) * powder)


def room_hum():
    """Room air, a soft drone and wavering tones."""
    t = np.arange(N) / SR
    air = unit(filtered(rng.standard_normal(N), lambda hz: amp(along(AIR_SPECTRUM, hz))))
    drone = unit(filtered(rng.standard_normal(N), lambda hz: resonance(hz, 236.2, 28) ** 2))
    tones = np.zeros(N)
    for hz, db, waver_db in HUM_TONES:
        waver = amp(waver_db * wobble(13))
        tones += amp(db) * unit(waver * np.sin(2 * np.pi * hz * t + wobble(13)))
    hum_gain = amp(np.interp(t, *np.transpose(HUM_GAIN)))
    return amp(-45.5) * air + hum_gain * (amp(-51) * drone + tones)


def fragment_ring(drive, ring_hz):
    """A fragment rings in a broad main mode and a narrower upper one of random strength."""
    upper_gain = amp(-10 + 3 * rng.standard_normal())

    def response(hz):
        main = resonance(hz, ring_hz, ring_hz / 1.9)
        upper = upper_gain * resonance(hz, 1.42 * ring_hz, ring_hz / 6)
        return (main + upper) * resonance(hz, ring_hz, 1.26 * ring_hz)
    return filtered(drive, response)


def snaps():
    """Fracture: one release in a dying run of cracks; fragment rings, grit sprays, hand knocks."""
    def at_level(x, db):
        return amp(db) * x * np.sqrt(SNAP_RMS_SPAN_S * SR / np.sum(x ** 2))

    out, t = np.zeros(N), np.arange(4096) / SR
    lead_samples = round(0.0008 * SR)
    release = signal.unit_impulse(len(t), lead_samples)
    run_envelope = amp(-60 * t / 0.013) * (1 - np.exp(-t / 0.0015))
    for time_s, ring_db, ring_hz, crack_db, knock_db in SNAPS:
        runs = rng.standard_normal((2, len(t))) ** 3 * run_envelope
        deep, shallow = runs / np.linalg.norm(runs, axis=1, keepdims=True)
        ring = fragment_ring(release + 0.91 * deep, ring_hz)
        crack = coloured(release + 1.5 * shallow, CRACK_SPECTRUM)
        knock = filtered(release + 0.5 * deep, lambda hz: resonance(hz, 448, 730) ** 2)
        spray = coloured(rng.laplace(size=len(t)) * amp(-60 * t / 0.16), CRACK_SPECTRUM)
        snap = (at_level(ring, ring_db + 0.5) + at_level(crack, crack_db + 0.5)
                + at_level(spray, crack_db - 15) - at_level(knock, knock_db))
        add(out, time_s - lead_samples / SR, rng.choice([-1, 1]) * snap)
    return out


def splinters():
    """Each splinter flies off with a short glassy tick."""
    out, t = np.zeros(N), np.arange(512) / SR
    tick = np.exp(-np.pi * SPLINTER_WIDTH_HZ * t) * np.cos(2 * np.pi * SPLINTER_HZ * t)
    for time_s, db in SPLINTERS:
        tail = 0.67 * amp(-60 * t / 0.0091) * rng.standard_normal(len(t))
        add(out, time_s, amp(db - 2) * (tick + tail))
    return 2 * filtered(out, lambda hz: resonance(hz, SPLINTER_HZ, SPLINTER_WIDTH_HZ) ** 2)


def rubbing():
    """Skin slips and catches on grit; the hollow under the hand gives the hiss a gliding colour."""
    catches = unit(grains(rate_hz=1300, spread_db=3.2, clump_db=2.8))
    slips = unit(grains(rate_hz=16000, spread_db=3.5, clump_db=1.8))
    friction = unit(slips + amp(RUB_CATCH_DB) * catches)
    rumble = unit(coloured(friction, POWDER_SPECTRUM))
    rasp = unit(coloured(friction, RASP_SPECTRUM)) + amp(RUB_RUMBLE_DB) * rumble
    sizzle = unit(coloured(friction, SIZZLE_SPECTRUM))
    hollow = unit(resonated(friction, HOLLOW_MODES))
    rest_hz = HOLLOW_MODES[2][0]  # strongest mode
    chatter = CHATTER_PITCH_SHARE * wobble(CHATTER_RATE_HZ)
    out = np.zeros(N)
    for start_s, length_s, t60_s, rasp_db, sizzle_db, swell_db, hollow_db, from_hz, to_hz, rough in RUBS:
        gain = stroke(length_s, RUB_ATTACK_S, t60_s, swell_db)
        age = np.arange(len(gain))
        now = (round(start_s * SR) + age) % N
        # modes glide together with the hollow's size; skin chatter smears them
        pitch_hz = np.interp(age / SR, [0, length_s], [from_hz, to_hz]) * (1 + rough * chatter[now])
        at_rest = np.roll(hollow, -now[0])[:3 * len(age)]
        gliding = map_coordinates(at_rest, [np.cumsum(pitch_hz / rest_hz)], mode="wrap")
        scrape = amp(rasp_db) * (rasp[now] + amp(hollow_db) * gliding)
        add(out, start_s, gain * (scrape + amp(sizzle_db) * sizzle[now]))
    return out * amp(2.2 * wobble(110))


def impacts():
    """Chips clink, soft blows thud, big breaks boom in the tub: damped sines."""
    out, t = np.zeros(N), np.arange(SR // 2) / SR
    clinks = [(*chip, CLINK_T60_S) for chip in CLINKS]
    booms = [(time_s, db + mode_db, hz, t60_s) for time_s, db in BOOMS
             for hz, mode_db, t60_s in BOOM_MODES]
    for time_s, db, hz, t60_s in clinks + BUMPS + booms:
        rise = 1 - np.exp(-t * hz / 0.26)
        add(out, time_s, -amp(db - 60 * t / t60_s) * np.sin(2 * np.pi * hz * t) * rise)
    return out


def room_reverb(x):
    """Short diffuse tail with frequency-dependent decay."""
    hz, t, noise = signal.stft(rng.standard_normal(SR // 2), SR, nperseg=256)
    decay = amp(-60 * t / along(ROOM_DECAY, hz)[:, None])
    tail = signal.istft(noise * decay, SR, nperseg=256)[1]
    tail[:int(0.004 * SR)] = 0
    return signal.fftconvolve(x, tail / np.linalg.norm(tail))[:N]


def scene():
    """Close chalk plus tub resonance, reverb and hum; mono."""
    chalk = crumbling(*crushing_gains()) + rubbing() + impacts() + splinters() + snaps()
    tub = resonated(chalk, TUB_MODES)
    return (chalk + amp(-11) * tub + amp(-14.5) * room_reverb(chalk) + room_hum())[None]


def record(dry):
    """Microphone: bass cut, saturation on the hardest snaps, band limit."""
    bass_cut = signal.lfilter(*signal.butter(1, 25, "highpass", fs=SR), dry[0])
    saturated = bass_cut / (1 + np.abs(bass_cut / 1.1) ** 6) ** (1 / 6)
    return filtered(saturated, lambda hz: 1 / (1 + (hz / BAND_LIMIT_HZ) ** 120))[None]


dry = scene()
out = record(dry)
materialize(out)
```